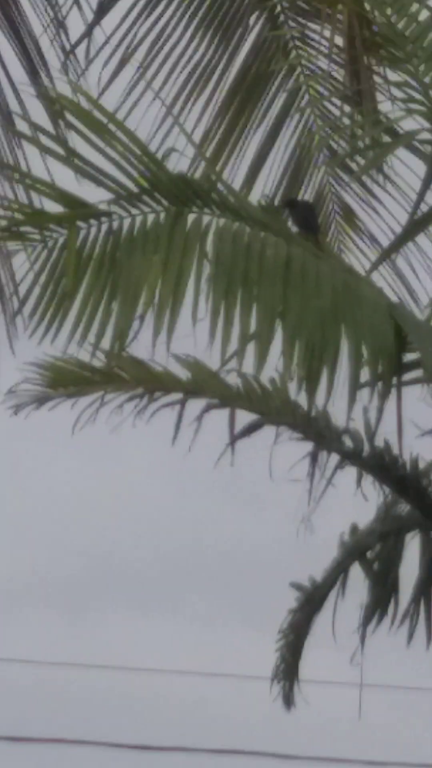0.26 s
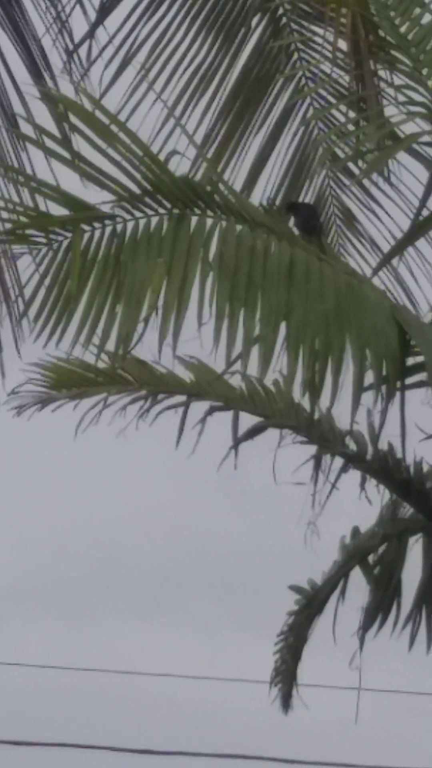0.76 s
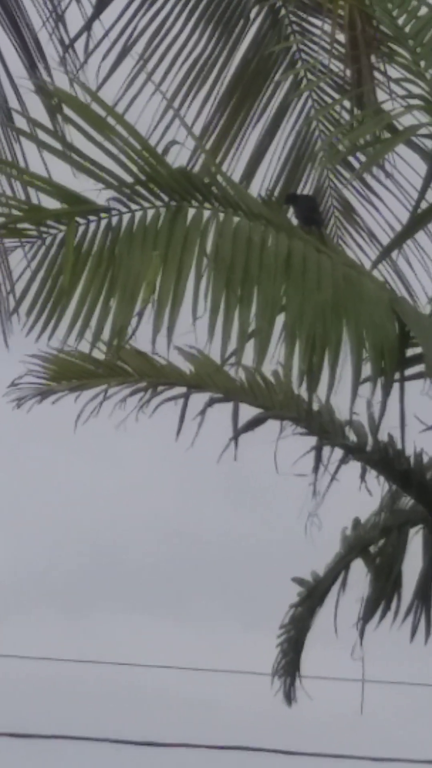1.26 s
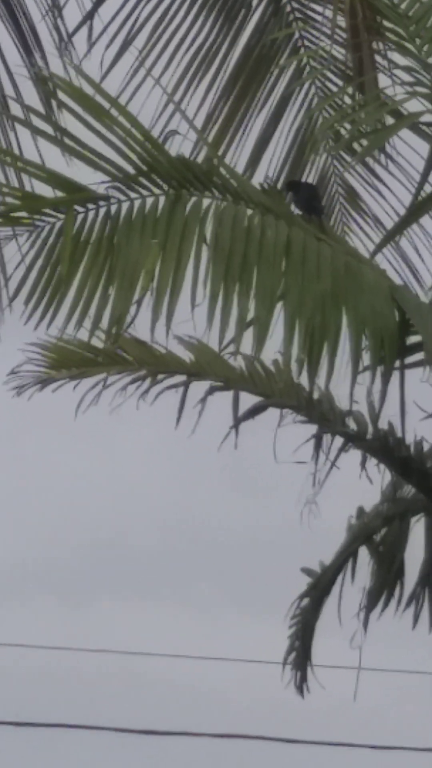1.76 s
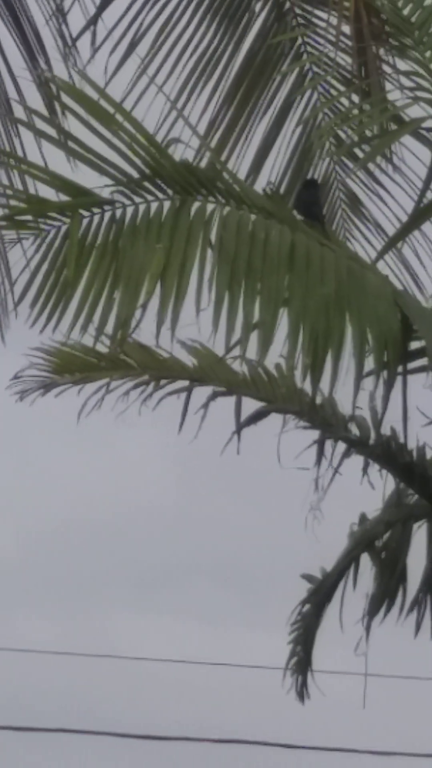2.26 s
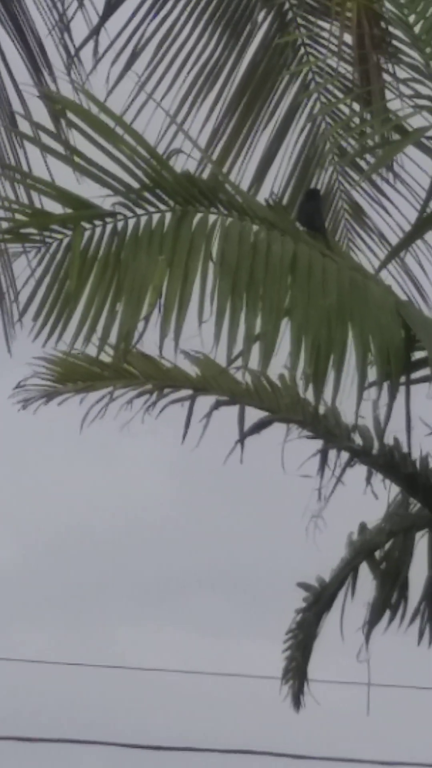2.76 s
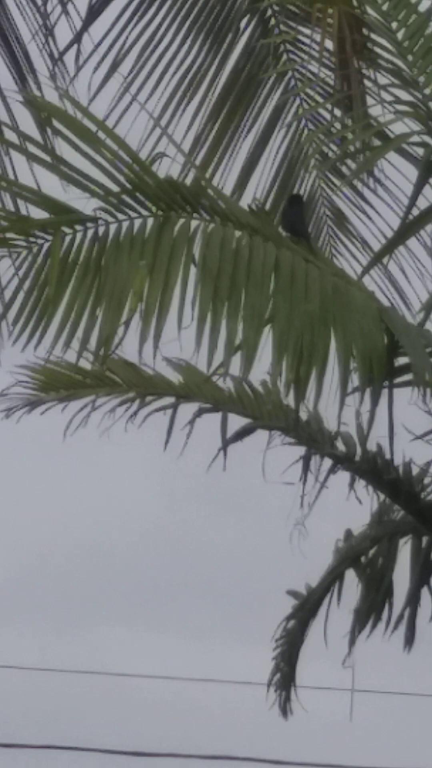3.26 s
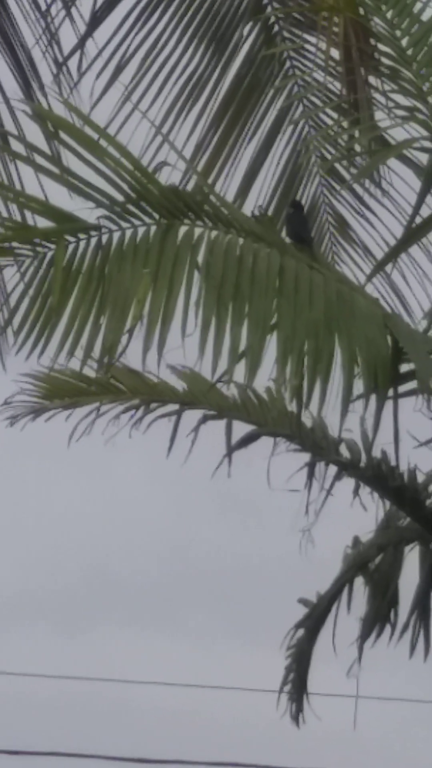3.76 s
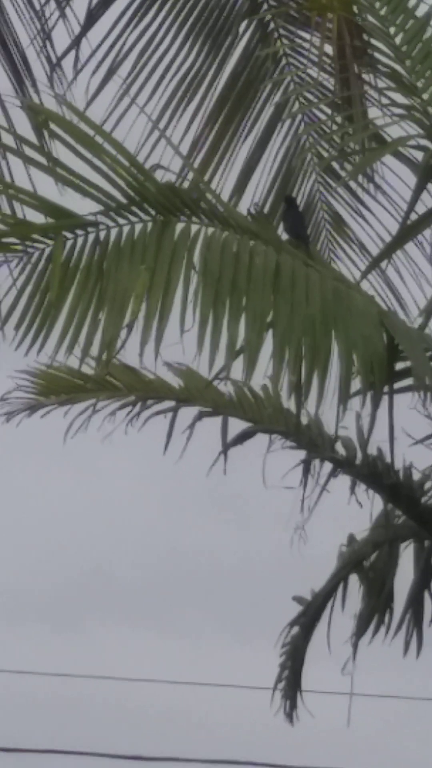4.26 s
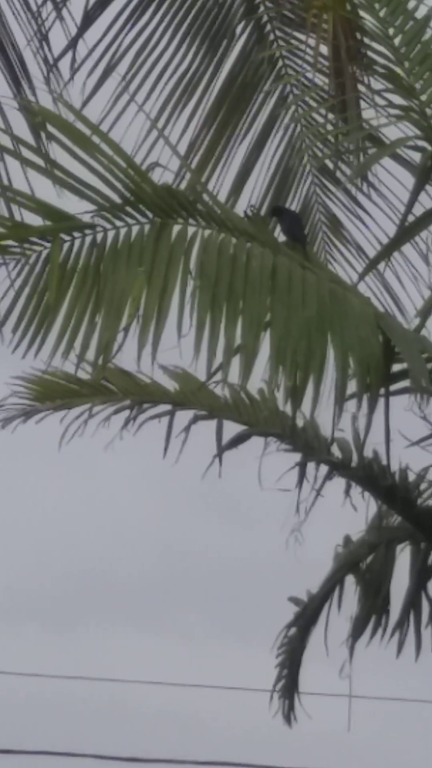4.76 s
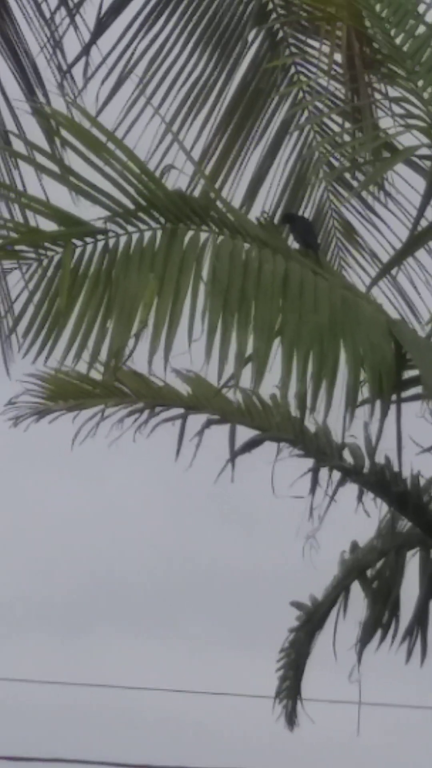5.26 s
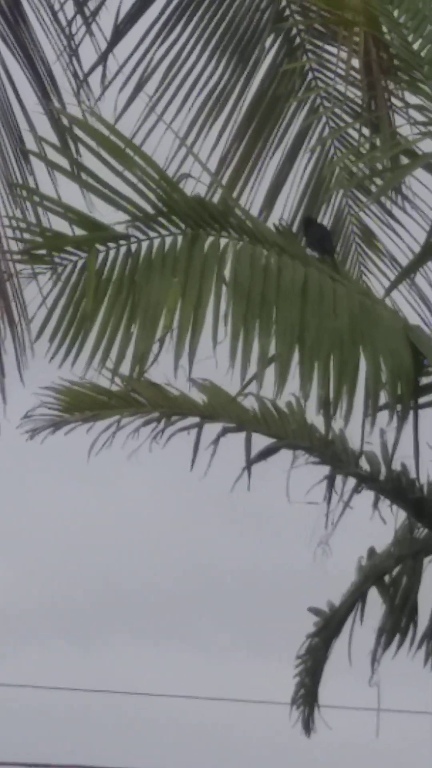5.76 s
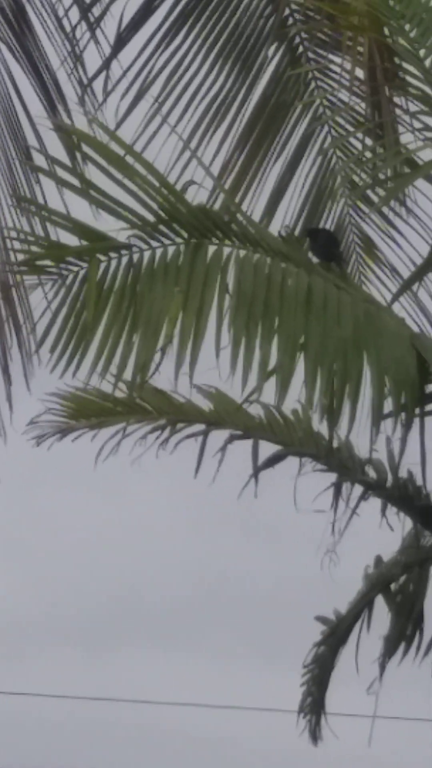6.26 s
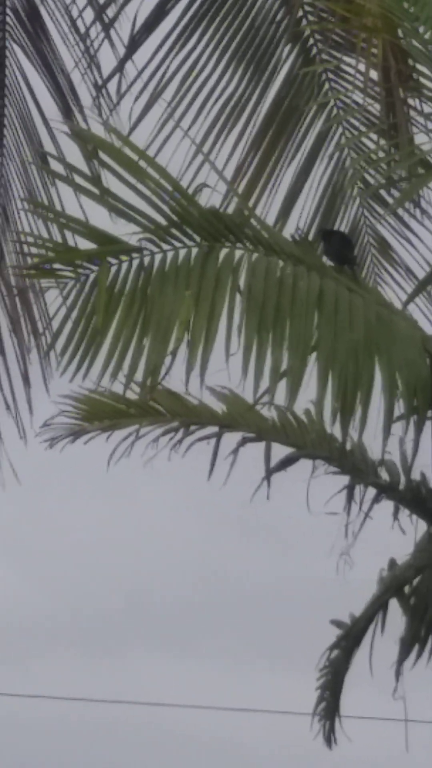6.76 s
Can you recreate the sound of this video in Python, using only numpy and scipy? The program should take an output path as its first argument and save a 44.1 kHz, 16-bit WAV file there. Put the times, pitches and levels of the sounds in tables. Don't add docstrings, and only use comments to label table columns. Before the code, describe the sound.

Outdoor songbirds with sweet scooping whistles, quick cheeps and distant buzzes, over regular slow saw strokes on a board and low distant rumble.

```python
import sys
import numpy as np
from scipy import signal
from scipy.fft import rfft, irfft, next_fast_len
from scipy.io import wavfile
from scipy.ndimage import uniform_filter1d

SR = 44100
rng = np.random.default_rng(int(sys.argv[2]) if len(sys.argv) > 2 else 0)


def decibels_to_gain(level_db):
    exponent = np.asarray(level_db, float) / 20
    return 10 ** exponent


def digitize_waveform(pressure):
    field = np.atleast_2d(pressure).T
    bounded = np.clip(field, -1, 1)
    quanta = np.round(bounded * 32767).astype(np.int16)
    wavfile.write(sys.argv[1], SR, quanta)


N = 309582


def evened(x):
    return x / np.sqrt(np.mean(x ** 2) + 1e-20)


def noise():
    return rng.standard_normal(N)


def smooth_noise(length, window):
    return evened(signal.oaconvolve(rng.standard_normal(length), np.hanning(window), "same"))


def read(points, hz):
    f, value = np.transpose(points)
    return np.interp(np.log(hz + 1), np.log(f + 1), value)


def colour(x, points):
    size = next_fast_len(len(x))
    gain = decibels_to_gain(read(points, np.fft.rfftfreq(size, 1 / SR)))
    return irfft(rfft(x, size) * gain, size)[:len(x)]


def resonate(x, hz, width):
    turn = np.exp(2j * np.pi * np.cumsum(hz * np.ones(len(x))) / SR)
    r = np.exp(-np.pi * width / SR)
    return 2 * (turn * signal.lfilter([1 - r], [1, -r], x / turn + 1e-18)).real


def double_modes(x, modes):
    return sum(decibels_to_gain(db) * evened(resonate(resonate(x, hz, 2 * width), hz, width)) for hz, width, db in modes)


def slide(row, bend, start_db, end_db, top=0.49):
    s, length, first_hz, last_hz, db = row
    u = np.linspace(0, 1, num=13)
    rising_db = start_db * (s > 0) * (1 - u / top) ** 2
    falling_db = end_db * ((u - top) / (1 - top)) ** 2
    hz = last_hz + (first_hz - last_hz) * (1 - u) ** bend
    return np.transpose([s + length * u, hz, db + np.where(u < top, rising_db, falling_db)])


def sing(mix, rows, second_db=-60, third_db=-90, warble_hz=50, depth_hz=0, waver=0.0067, flutter_db=0.0,
         smooth_s=0.0023):
    s, hz, db = np.transpose(rows)
    t = np.arange(s[0], s[-1], 1 / SR)
    drift, flutter = (smooth_noise(2 * SR // 3, 480)[:len(t)] for _ in range(2))
    hz = uniform_filter1d(np.interp(t, s, hz), round(smooth_s * SR), mode="nearest") * (1 + waver * drift)
    warble = depth_hz * np.sin(2 * np.pi * warble_hz * (t - s[0]))
    turn = 2 * np.pi * np.cumsum(hz + warble) / SR
    tone = np.sin(turn) + decibels_to_gain(second_db) * np.sin(2 * turn) + decibels_to_gain(third_db) * np.sin(3 * turn)
    to_edge_s = np.minimum(t - s[0] + (s[0] == 0), s[-1] - t)
    edges = np.sin(np.pi / 2 * np.clip(to_edge_s / 0.0029, 0, 1)) ** 2
    level = decibels_to_gain(np.interp(t, s, db) + flutter_db * flutter)
    part = mix[round(s[0] * SR):][:len(t)]
    part += (np.sqrt(2) * tone * level * edges)[:len(part)]


def chirps(per_s, low_hz, high_hz, length_s, fall, spread_db, count=8):
    t, out = np.arange(0, 1, 1 / (length_s * SR)), np.zeros(N)
    size = decibels_to_gain(spread_db * rng.exponential(1, N))
    for hz in np.linspace(low_hz, high_hz, count):
        chirp = np.sin(2 * np.pi * np.cumsum(hz * (1 + fall * (.5 - t))) / SR) * np.sin(np.pi * t) ** 2
        struck = rng.random(N) < per_s / count / SR
        out += signal.oaconvolve(size * struck, chirp)[:N]
    return evened(out)


# frequency in Hz, time to fall 60 dB in seconds.
YARD_T60 = [(1500, 0.98), (3000, 0.55), (6000, 0.87), (10000, 0.65)]


def yard(x, first_s, rise_s, reach):
    taps = np.zeros(SR)
    at = np.arange(round(first_s * SR), SR - 20, 20)
    taps[at + rng.integers(0, 20, len(at))] = rng.choice([-1., 1.], len(at))
    hz, t, z = signal.stft(taps, SR, nperseg=256)
    t60 = reach * read(YARD_T60, hz)[:, None]
    decay = decibels_to_gain(-60 * t / t60) * (1 - np.exp(-t / rise_s))
    tail = signal.istft(z * decay, SR, nperseg=256)[1]
    return signal.oaconvolve(x, tail / np.linalg.norm(tail))[:N]


def stirred(x, beat_s, steady=0.0):
    return x * evened(steady + smooth_noise(N, round(beat_s * SR)))


# delay in seconds, level in dB.
WALL_ECHOES = [(.009, -14.5), (.023, -12), (.041, -18.5)]


def wall_echoes(x):
    x = x * np.minimum(np.arange(N) / (.008 * SR), 1)
    return sum(decibels_to_gain(db) * np.pad(x, (round(s * SR), 0))[:N] for s, db in WALL_ECHOES)


# time in seconds, pitch in Hz, level in dB.
SCOOPED_WHISTLES = [
    [(0.184, 2615, -58.5), (0.216, 2487, -43), (0.32, 2144, -40), (0.344, 2162, -32.5),
     (0.358, 2190, -45.5), (0.368, 2350, -41), (0.422, 2404, -48), (0.476, 2388, -40.5), (0.556, 2377, -59)],
    [(1.509, 2554, -58.5), (1.533, 2236, -54.5), (1.651, 2054, -38.5), (1.661, 2050, -45.5),
     (1.737, 2012, -38), (1.807, 2038, -44), (1.843, 2348, -39.5), (1.889, 2420, -38), (1.918, 2387, -45.5)],
    [(2.782, 2560, -67), (2.798, 2476, -52), (2.886, 1995, -43), (2.912, 1788, -51), (2.966, 1750, -39),
     (3.014, 1941, -49.5), (3.028, 1983, -37), (3.096, 2137, -46.5), (3.135, 2100, -46)],
    [(3.262, 2610, -62), (3.28, 2546, -45), (3.306, 2402, -39.5), (3.4, 2119, -42.5), (3.444, 2084, -41.5),
     (3.474, 2250, -47.5), (3.494, 2260, -40), (3.56, 2308, -46), (3.566, 2310, -56)],
    [(4.835, 2275, -72), (4.853, 2270, -53), (4.911, 1966, -41.5), (4.935, 1713, -50), (4.963, 1673, -38),
     (4.977, 1853, -48), (4.991, 1980, -40), (5.057, 2218, -48.5), (5.15, 2190, -54.5)],
    [(5.226, 2510, -61), (5.248, 2570, -46), (5.272, 2380, -47), (5.33, 2272, -53), (5.35, 2300, -61),
     (5.36, 2190, -49), (5.394, 2276, -47.5), (5.434, 2620, -42.5), (5.45, 2617, -49)],
]
SCOOP_THIRD_HARMONIC = -58, -56, -56, -48.5, -55, -30.5
# time in seconds, pitch in Hz, level in dB.
PLAIN_NOTES = [
    [(0.0, 1993, -37.5), (0.014, 2037, -39), (0.022, 2080, -37), (0.036, 2055, -42.5), (0.068, 2168, -37),
     (0.102, 2100, -67), (0.11, 2180, -57)],
    [(2.05, 3090, -67), (2.062, 3100, -57), (2.088, 3010, -44.5), (2.16, 2785, -39), (2.248, 2804, -57),
     (2.3, 2793, -61.5), (2.4, 2796, -77)],
    [(2.576, 1526, -66), (2.58, 1540, -58), (2.604, 1630, -54), (2.614, 1628, -46), (2.622, 1673, -59),
     (2.636, 1677, -48), (2.68, 1643, -69)],
    [(3.838, 2070, -78), (3.848, 1921, -70), (3.872, 1943, -47.5), (3.906, 1956, -45), (3.914, 2025, -53),
     (3.924, 1987, -50.5), (3.94, 1960, -63)],
    [(4.1, 1940, -56), (4.124, 1950, -44.5), (4.272, 1982, -36.5), (4.286, 1957, -42), (4.322, 1985, -48.5),
     (4.334, 1960, -57.5), (4.5, 1944, -65), (4.62, 1944, -72)],
]


def near_bird():
    song = np.zeros(N)
    for rows, third_db in zip(SCOOPED_WHISTLES, SCOOP_THIRD_HARMONIC):
        sing(song, rows, -63, third_db, waver=0.0029, flutter_db=2, smooth_s=0.021)
    for rows in PLAIN_NOTES:
        sing(song, rows, -63, -45, waver=0.002, flutter_db=2, smooth_s=.01)
    early = decibels_to_gain(-7.5) * yard(song, 0.0041, 0.0033, 0.35)
    late = decibels_to_gain(-15.0) * stirred(yard(song, .03, 0.01, 0.84), 0.013, 1.7)
    return decibels_to_gain(-0.5) * (song + wall_echoes(song)) + early + late


# moment of full speed in seconds, lead of the push in seconds,
# push on the board in dB, ring of the blade in dB, rasp of the teeth in dB.
SAW_STROKES = [
    (0.447, 0.073, -46, -57.5, -61),
    (1.326, 0.089, -50, -80, -63),
    (2.184, 0.078, -45.5, -53, -60),
    (3.11, 0.055, -44, -49, -54),
    (3.995, 0.05, -48.5, -51, -58.5),
    (4.904, 0.072, -41, -44.5, -58.5),
    (5.653, 0.027, -51, -56, -60.5),
    (6.515, 0.04, -46.5, -54, -62),
]
# frequency in Hz, width in Hz, level in dB.
BOARD_MODES = [(179, 69.4, 7.5), (225.4, 34, -1.5), (293.8, 18.2, -2.5), (398.4, 22.5, -4.5),
               (426.3, 63, -4), (195.3, 12, -9.5), (350.7, 25.5, -0.5)]
# frequency in Hz, width in Hz, level in dB.
BLADE_MODES = [(790, 275, 4.5), (927, 270, -0.5)]
# frequency in Hz, density in dB per Hz.
RASP_SPECTRUM = [(290, -24.5), (500, -18.5), (765, -8), (1100, -4), (1460, 1), (2090, -1.5), (2800, -20.5),
                 (3860, -22), (4280, -23), (4800, -20.5), (6240, -42), (10600, -120)]


def stroke_level(full_speed, peak_db, rise, fall, rest_db, lead_s=0):
    t = np.arange(N) / SR
    before = np.maximum(full_speed - t - lead_s, 0)
    after = np.maximum(t - full_speed, 0)
    return decibels_to_gain(np.maximum((peak_db - rise * before - fall * after).max(0), rest_db))


def saw():
    full_speed, lead, push_db, ring_db, rasp_db = np.transpose(SAW_STROKES)[:, :, None]
    push = stroke_level(full_speed, push_db, 263, 65, -72.5, lead)
    ring = stroke_level(full_speed, ring_db, 200, 71, -78.5)
    rasp = stroke_level(full_speed, rasp_db, 210, 69.5, -81)
    teeth_hz = 80.03 * (1 + .06 * evened(uniform_filter1d(noise(), 900)))
    turns = np.cumsum(teeth_hz) / SR
    teeth = np.diff(np.floor(turns), prepend=0) * decibels_to_gain(3.0 * noise())
    board = double_modes(0.46 * evened(teeth) + 0.92 * noise(), BOARD_MODES)
    scrape = (2.8 + np.exp(-(turns % 1) / 0.5)) * noise()
    blade = double_modes(scrape, BLADE_MODES)
    out = push * evened(board) + decibels_to_gain(-1.5) * ring * evened(blade)
    return out + decibels_to_gain(8.5) * rasp * evened(colour(scrape, RASP_SPECTRUM))


# time in seconds, pitch in Hz, level in dB.
DIP_CALL = [(1.238, 2333, -44), (1.255, 1978, -42), (1.276, 1691, -48.5), (1.295, 1582, -53.5),
            (1.308, 1579, -46), (1.322, 1787, -42), (1.332, 1920, -44.5), (1.35, 1900, -47)]
# time in seconds, pitch in Hz, level in dB.
HOOK_CALL = [(2.465, 2330, -67), (2.474, 1990, -57.5), (2.488, 1754, -57), (2.504, 1620, -58)]
# start in seconds, peak level in dB, high pitch in Hz, low pitch in Hz.
DOUBLE_PIPS = [
    (.614, -53, 2134, 1760),
    (0.755, -52.5, 2070, 1755),
    (0.918, -56, 2102, 1760),
]


def warbler():
    song = np.zeros(N)
    sing(song, DIP_CALL, waver=0.005, flutter_db=3.0, smooth_s=0.005)
    sing(song, HOOK_CALL, waver=0.014, flutter_db=2.5)
    pip_s, lag_s = 0.033, 0.024
    for s, db, high, low in DOUBLE_PIPS:
        upper = slide((s, pip_s, high * .99, high * 1.005, db), 0.94, -6, -9, .7)
        lower = slide((s + lag_s, pip_s, low * 1.015, low, db - 2.5), 1.5, -6, -11)
        sing(song, upper, waver=0.014, flutter_db=3.0)
        sing(song, lower, waver=0.012, flutter_db=3.0)
    song = song + decibels_to_gain(-8.0) * np.roll(song, round(0.016 * SR))
    early = decibels_to_gain(-6.5) * yard(song, .006, .004, 0.2)
    late = decibels_to_gain(-14) * stirred(yard(song, 0.026, .01, 0.55), 0.0088)
    return decibels_to_gain(-1.0) * song + early + late


# time in seconds, pitch in Hz, level in dB.
WARBLED_NOTES = [
    [(1.096, 2388, -68), (1.13, 2376, -50.5), (1.2, 2351, -41.5), (1.243, 2312, -49.5), (1.275, 2286, -55)],
    [(4.528, 3050, -70), (4.556, 2900, -52.5), (4.571, 2660, -57), (4.587, 2474, -46), (4.64, 2408, -47),
     (4.665, 2306, -64)],
]


def trills():
    song = np.zeros(N)
    for rows, hz, depth in zip(WARBLED_NOTES, (51.5, 50), (135, 75)):
        sing(song, rows, warble_hz=hz, depth_hz=depth, waver=0.0034, flutter_db=2)
    return decibels_to_gain(0.5) * song + decibels_to_gain(-5) * yard(song, .015, .01, 0.39)


# start in seconds, length in seconds, first and last pitch in Hz, peak level in dB.
STEEP_CHIPS = [
    (1.568, 0.082, 8500, 3174, -49.5),
    (2.018, 0.056, 8060, 3420, -50.5),
    (2.106, 0.064, 8420, 3255, -47),
]
# frequency in Hz, gain in dB.
WALL_COLOUR = [(3000, -13), (4200, 7), (5500, 1), (9000, -5.5)]


def steep_chips():
    song = np.zeros(N)
    for row in STEEP_CHIPS:
        sing(song, slide(row, 1.7, -7, -46.5, 0.25), -40, waver=0.008, flutter_db=1.0, smooth_s=0.0019)
    broken = decibels_to_gain(3.8 * smooth_noise(N, 220))
    echo = colour(yard(song, 0.0065, 0.018, 0.79), WALL_COLOUR)
    return decibels_to_gain(-2.0) * broken * song + decibels_to_gain(2.5) * echo


# start in seconds, first note in dB, second note in dB.
FINCH_CHEEPS = [(0.134, -57.5, -63), (0.507, -53, -66), (0.861, -61.5, -77), (1.266, -60, -71),
                (2.612, -60.5, -64.5), (3.157, -59.5, -78), (4.344, -61, -72), (4.888, -58.5, -67),
                (5.424, -58.5, -68.5), (5.929, -54, -66), (6.435, -60, -71)]
# time from its start in seconds, pitch in Hz, level in dB.
LOW_VOICE = [(0, 5100, -14), (.014, 5920, -4.5), (.03, 5580, -1), (.05, 4900, -10.5)]
# time from its start in seconds, pitch in Hz, level in dB.
HIGH_VOICE = [(0, 5780, -12), (.018, 6450, -5.5), (0.041, 6000, -1), (.06, 5840, 1), (.08, 5300, -7)]
# start in seconds, length in seconds, first and last pitch in Hz, peak level in dB.
SOFT_CHIPS = [(1.12, 0.041, 4800, 6600, -53.5), (5.904, 0.024, 5760, 4500, -57),
              (5.899, .014, 5850, 5800, -58), (5.024, 0.016, 15000, 8200, -71),
              (4.904, .012, 9500, 7000, -75), (2.833, 0.016, 8800, 7400, -48),
              (3.71, .03, 6100, 5500, -65.5), (5.4, .016, 7200, 7400, -71),
              (3.68, 0.07, 5600, 10200, -67.5), (3.69, .04, 6200, 8700, -63),
              (3.945, 0.025, 8700, 8200, -69.5)]


def chips():
    song = np.zeros(N)
    for s, db, then_db in FINCH_CHEEPS:
        for voice in (LOW_VOICE, HIGH_VOICE):
            sing(song, np.add(voice, (s, 0, db)), -36, warble_hz=184.4, depth_hz=60, waver=0.008,
                 flutter_db=2.5, smooth_s=0.0043)
        then = [(s + .11, 4750, then_db - 16.0), (s + 0.12, 5000, then_db), (s + 0.2, 5700, then_db)]
        sing(song, then, warble_hz=173.1, depth_hz=333, waver=0.021, flutter_db=-0.5)
    for row in SOFT_CHIPS:
        sing(song, slide(row, 1.1, -9, -12.5), waver=0.009, flutter_db=3.5, smooth_s=0.0021)
    return decibels_to_gain(-2.0) * song + decibels_to_gain(-2.5) * yard(song, 0.0031, 0.0023, 0.42)


# start in seconds, length in seconds, first and last pitch in Hz, peak level in dB.
RISING_WHITS = [(0.878, 0.068, 2720, 3550, -65.5), (1.12, 0.063, 2700, 3600, -69.5),
                (2.786, 0.06, 2750, 3300, -67.5), (6.25, .06, 3500, 3620, -80),
                (6.9, 0.075, 3500, 3620, -81), (0.844, .055, 7800, 8370, -68), (1.1, .025, 7950, 9100, -81),
                (2.815, 0.045, 7500, 8350, -57), (2.752, 0.0448, 5000, 5750, -62),
                (5.02, 0.013, 7270, 8540, -77)]
# start in
# seconds, length in seconds, first and last pitch in Hz, peak level in dB.
THIN_GLIDES = [(0.37, 0.13, 7050, 7080, -81.5), (0.75, 0.03, 5400, 5500, -70),
               (2.11, 0.115, 8900, 8350, -68.5), (2.197, 0.066, 2900, 4600, -56),
               (2.37, .08, 4500, 4250, -74), (5.345, .05, 8750, 8550, -80.5),
               (3.386, 0.091, 8340, 8600, -84), (3.585, 0.076, 3650, 3500, -81),
               (3.786, .07, 8100, 7620, -71), (6.35, 0.1, 4600, 4900, -83), (6.499, 0.19, 3490, 3150, -85),
               (4.6, 0.017, 3620, 3400, -74), (5.017, .016, 4300, 5000, -75),
               (2.017, 0.029, 3400, 3180, -74), (5.703, 0.285, 5450, 5370, -78),
               (6.496, 0.27, 5090, 4710, -77), (6.65, 0.31, 5250, 5450, -78.5),
               (6.845, 0.11, 8700, 6600, -73), (6.73, .17, 5700, 6150, -81), (6.74, .11, 5200, 3950, -81),
               (1.185, 0.061, 3650, 3600, -74), (2.86, .085, 8350, 7950, -66), (7.5, .04, 3200, 3100, -82),
               (5.4, .14, 3600, 3520, -84), (4.1, .06, 3650, 3200, -80)]
# time in seconds, pitch in Hz, level in dB.
RISING_CALL = [(5.58, 2690, -80), (5.603, 3000, -72), (5.614, 3250, -55), (5.628, 3580, -71),
               (5.642, 3936, -64), (5.67, 4010, -70)]
# time in seconds, pitch in Hz, level in dB.
ARCHED_CALL = [(3.679, 3400, -74), (3.725, 4250, -76), (3.76, 5700, -58.5), (3.81, 6590, -71),
               (3.843, 7090, -51), (3.88, 7130, -54.5), (3.92, 6560, -63.5), (3.955, 5680, -59),
               (3.995, 4560, -65.5)]


def thin_glides():
    song = np.zeros(N)
    for row in RISING_WHITS:
        sing(song, slide(row, 1.7, -10, -1, 0.73), waver=.009, flutter_db=3.0)
    for row in THIN_GLIDES:
        sing(song, slide(row, 1.4, -10, -4.5), waver=.009, flutter_db=3.0)
    sing(song, RISING_CALL, waver=0.0064, flutter_db=3, smooth_s=.006)
    sing(song, ARCHED_CALL, -29, waver=0.0029, flutter_db=3.5, smooth_s=0.021)
    return decibels_to_gain(2.0) * song + decibels_to_gain(-1.0) * stirred(yard(song, 0.0045, 0.0046, 0.55), 0.0054, 0.8)


# frequency in Hz, gain in dB.
BUZZ_COLOUR = [(3000, -26), (3500, 7), (4300, -4.5), (5000, 4.5), (9000, -6), (10000, -15.5),
               (16000, -52.5)]
# middle in seconds, peak level in dB, centre in Hz, half length in seconds.
FAR_BUZZES = [(0.002, -55.5, 9900, 0.0091), (4.03, -63.5, 5360, 0.25), (1.706, -56, 6540, 0.045),
              (0.215, -60.5, 8700, 0.069), (0.783, -66, 8800, 0.062), (0.999, -73.5, 9520, 0.076),
              (1.21, -74, 7760, 0.16), (1.561, -63.5, 7960, 0.065), (1.956, -67, 7300, 0.28),
              (2.828, -58.5, 7650, 0.091), (2.993, -64, 7450, 0.095), (3.626, -63.5, 7900, 0.075),
              (3.8, -63, 7250, 0.2), (3.98, -71, 8380, 0.05), (4.537, -58.5, 7300, 0.088),
              (4.71, -65, 7270, 0.089), (4.923, -70, 7950, 0.028), (5.026, -61, 8570, 0.033),
              (5.136, -76, 8400, 0.011), (5.475, -61.5, 7180, 0.079), (5.688, -66.5, 7200, 0.073),
              (6.27, -69, 7500, 0.11), (6.567, -73, 8370, .04), (6.937, -60.5, 7500, 0.088)]


def buzzes():
    crowd = colour(chirps(6000, 3450, 10850, 0.0028, 0.068, 0.55, count=14), BUZZ_COLOUR)
    out = np.zeros(N)
    for s, db, hz, half in FAR_BUZZES:
        part = slice(max(round((s - 1.3 * half) * SR), 0), round((s + 1.9 * half) * SR))
        swell = np.exp(-((np.arange(N)[part] / SR - s) / half) ** 2 * 4.16)
        out[part] += decibels_to_gain(db) * swell * evened(resonate(crowd[part], hz, 1000))
    return out + decibels_to_gain(-2.0) * yard(out, 0.0049, 0.0018, 0.32)


# middle in seconds, half length in seconds,
# narrow band in dB, high wash in dB.
INSECT_SWELLS = [(.02, 0.13, -91, -80), (.45, 0.25, -75, -88), (1.04, 0.33, -69, -90),
                 (1.72, 0.18, -64.5, -76), (3.05, 0.29, -72, -82.5), (3.8, 0.07, -63, -72),
                 (3.95, 0.07, -63, -89), (4.87, 0.25, -74, -93), (5.51, 0.15, -86, -84),
                 (5.67, 0.088, -69, -104), (6.4, 0.39, -83, -84)]


def insects():
    t = np.arange(N) / SR
    middle, half, band_db, wash_db = np.transpose(INSECT_SWELLS)
    bells = np.array([np.exp(-((t - s) / h) ** 2) for s, h in zip(middle, half)])
    band = decibels_to_gain(-84) + decibels_to_gain(band_db) @ bells
    wash = decibels_to_gain(-85) + decibels_to_gain(wash_db) @ bells
    crowd = chirps(1500, 4890, 6190, 0.013, 0.033, 0.82, count=6)
    crowd = resonate(resonate(crowd, 5730, 640), 5670, 910)
    return band * evened(crowd) + wash * chirps(2500, 6500, 9000, .004, 0.23, 0.83, count=7)


# start in seconds, length in seconds, first and last pitch in Hz, peak level in dB.
LOW_HUMS = [
    (2.321, 0.27, 241.3, 234.8, -62),
    (5.8, 0.45, 240, 237.5, -64),
    (6.649, .36, 188.8, 239, -66.5),
]


def far_hum():
    out = np.zeros(N)
    for row in LOW_HUMS:
        sing(out, slide(row, 1.4, -7, -8), waver=0.014, flutter_db=2.5)
    return out


# frequency in Hz, density in dB per Hz.
AIR_SPECTRUM = [(15, -52), (25, -20.5), (120, 5), (185, -11.5), (236, -6), (530, -19), (1220, -23.5),
                (1990, -24.5), (2990, -32.5), (4600, -32), (5870, -50), (7480, -55), (10400, -38),
                (14700, -36.5), (16000, -36)]


def air():
    swell = evened(uniform_filter1d(noise(), 9000))
    return decibels_to_gain(-61 + 0.25 * swell) * evened(colour(noise(), AIR_SPECTRUM))


def scene():
    birds = near_bird() + warbler() + trills() + thin_glides() + steep_chips() + chips() + buzzes()
    mono = birds + saw() + insects() + far_hum() + air()
    return np.array([mono, mono])


# frequency in Hz, left minus right in dB.
PORT_TILT = [(1150, 0), (1400, 2.5), (2000, 4.5), (2500, 1.5), (2750, 1)]
# frequency in Hz, density in dB per Hz.
PORT_HISS = [(2350, -10.5), (4000, -10), (5470, -14.5), (7140, -4), (9260, -3.5), (15100, -5.5),
             (16000, -1.5)]


def two_ports(dry):
    half_tilt = np.array(PORT_TILT) * [1, .5]
    hiss = decibels_to_gain(-78.5) * evened(colour(noise(), PORT_HISS))
    left = colour(dry[0], half_tilt) + hiss
    right = colour(dry[1], half_tilt * [1, -1]) - hiss
    return np.array([left, right])


def top_cut(x):
    return signal.sosfilt(signal.butter(12, 15750, fs=SR, output="sos"), x)


def record(dry):
    return top_cut(two_ports(dry))


dry = scene()
out = record(dry)
digitize_waveform(out)
```